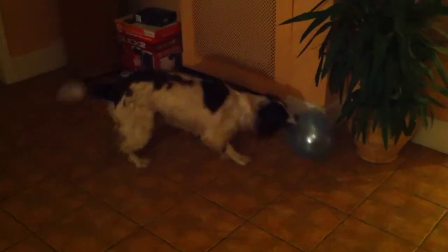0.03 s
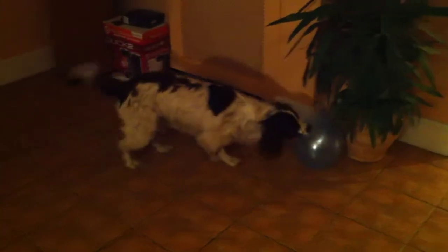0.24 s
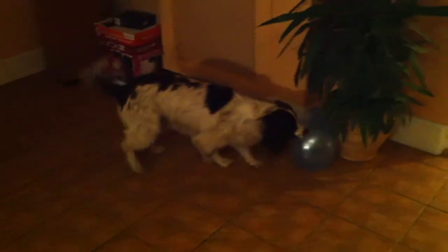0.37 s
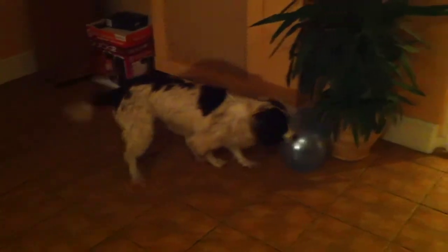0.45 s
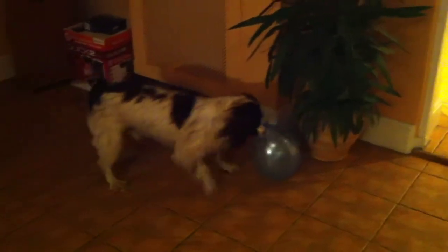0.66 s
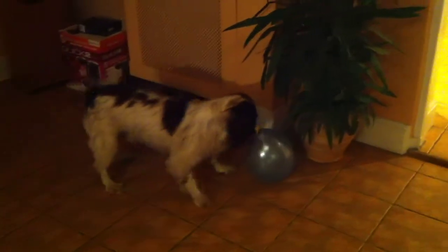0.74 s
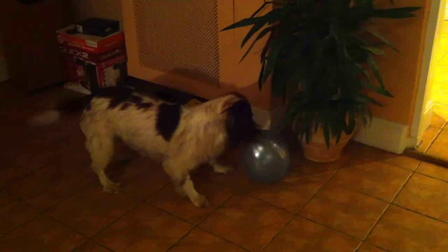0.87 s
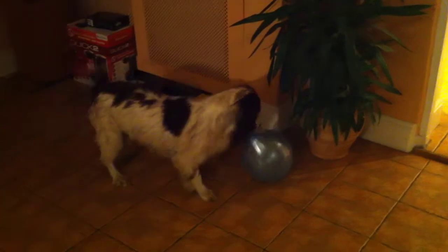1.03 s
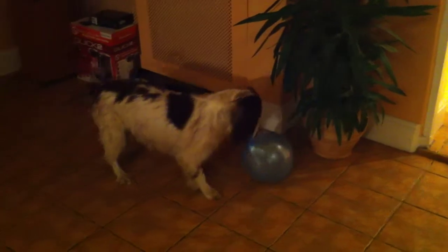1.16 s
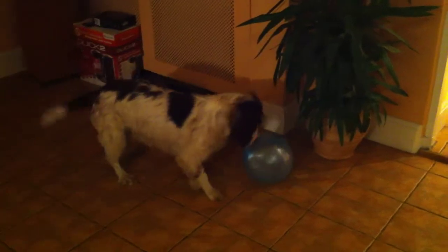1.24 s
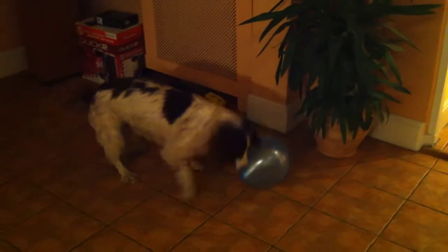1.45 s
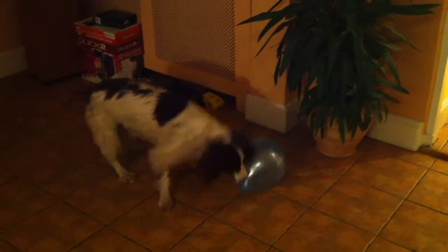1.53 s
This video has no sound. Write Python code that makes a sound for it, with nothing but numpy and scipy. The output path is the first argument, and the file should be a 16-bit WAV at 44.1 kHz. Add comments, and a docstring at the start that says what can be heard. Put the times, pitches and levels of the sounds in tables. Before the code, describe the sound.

A rubber balloon squeaks and bumps as a dog noses it across a tiled floor.

```python
"""A dog noses a balloon across the tiled floor of a hard, echoing room.
First a paw scuffs and the muzzle rubs the rubber, ringing the air inside, with a few soft bumps.
Almost at once the rubber sticks and slips in a shrill squeak, then in a lower, rasping one.
Paws go on scuffing the tiles under a tiny creak and fainter bumps.
A firmer bump comes near the end and rings in the room."""
import sys
import numpy as np
from scipy import signal
from scipy.fft import rfft, irfft, next_fast_len
from scipy.io import wavfile
from scipy.ndimage import map_coordinates

SR = 44100
rng = np.random.default_rng(int(sys.argv[2]) if len(sys.argv) > 2 else 0)


def unload_audio(sound):
    """Save the sound as a 16-bit wav file, at the path given as the first command line argument."""
    columns = np.transpose(np.atleast_2d(sound))
    # keep every value between -1 and 1, then stretch to whole-number steps
    steps = np.round(np.clip(columns, -1, 1) * 32767)
    wavfile.write(sys.argv[1], SR, steps.astype(np.int16))


N = 70560

# The dull colour of a soft scrape, paw or muzzle. Each row: frequency in Hz, level in dB.
SOFT_SCRAPE = [(40, -18.5), (90, -9), (140, -1.5), (280, -3), (480, 0), (750, 0.5), (1100, 2.5), (1550, -4),
               (2500, -8), (5000, -24), (16000, -34.5)]


def amp(db):
    return 10 ** (np.asarray(db) / 20)


def unit(x):
    return x / np.sqrt(np.mean(x ** 2) + 1e-20)


def along(points, hz):
    """Read a curve of (Hz, value) points on a log frequency axis."""
    freqs, values = np.transpose(points)
    return np.interp(np.log(hz + 1), np.log(freqs + 1), values)


def filtered(x, response):
    """Shape x with a gain that depends on frequency."""
    size = next_fast_len(N + 4096)
    return irfft(rfft(x, size) * response(np.fft.rfftfreq(size, 1 / SR)), size)[:N]


def coloured(x, spectrum):
    """EQ x with a curve of (Hz, dB) points and bring it to rms 1."""
    return unit(filtered(x, lambda hz: amp(along(spectrum, hz))))


def noise(spectrum):
    return coloured(rng.standard_normal(N), spectrum)


def wobble(rate):
    """A smooth random curve, rate knots a second."""
    return map_coordinates(rng.standard_normal(N // 8), [np.arange(N) * rate / SR], mode="wrap")


def stroke(start, length, attack_s=0.002, release_s=0.0066):
    """Fade in, hold, and fade out across the end of the stroke."""
    t = np.arange(N) / SR - start
    return np.clip(t / attack_s, 0, 1) * np.clip((length - t) / release_s + 0.5, 0, 1)


def room_tone():
    """A faint, steady bed of low noise."""
    # Each row: frequency in Hz, level in dB.
    bed_colour = [(25, -3), (60, 1), (130, 10.5), (300, 5.5), (1000, 0), (2000, -2.5), (5000, -8),
                  (10000, -11.5), (16000, -10.5)]
    return amp(-65.5) * noise(bed_colour)


def room(x, wet_db, build_s=0.0086):
    """Direct sound, a few slaps off the walls and a dense tail that lingers in the low mids."""
    # Each row: frequency in Hz, seconds to die away by 60 dB.
    decay_times = [(100, 0.2), (300, 0.99), (1100, 0.74), (2600, .68), (5000, 0.72), (9000, 0.57),
                   (15000, 0.49)]
    # Each row: echo delay in seconds, level in dB.
    wall_echoes = [(0.0121, -11), (0.028, -6), (0.07, -11.5)]
    hz, t, spectra = signal.stft(rng.standard_normal(SR), SR, nperseg=256)
    decay = amp(-60 * t / along(decay_times, hz)[:, None])
    build = 1 - np.exp(-t / build_s)
    tail = signal.istft(spectra * decay * build, SR, nperseg=256)[1]
    reverb = amp(-2) * tail / np.linalg.norm(tail)
    for delay, db in wall_echoes:
        reverb[round(delay * SR)] += amp(db)
    return amp(-3.5) * x + amp(wet_db) * signal.fftconvolve(x, reverb)[:N]


def paw_scuffs():
    """Each paw on the tiles gives a dull scrape of the pad and a hiss of claws and fur."""
    # Each row: start in seconds, length in seconds, pad level in dB, hiss level in dB.
    scuffs = [(-.03, 0.052, -53.5, -49.5), (0.623, .14, -56.5, -72), (0.802, 0.019, -51.5, -48.5),
              (0.829, 0.13, -55.5, -66.5), (1.197, 0.052, -62, -59.5), (1.256, 0.048, -63.5, -76),
              (1.40, 0.073, -61.5, -69.5), (1.481, 0.16, -73, -67), (1.545, 0.079, -63.5, -58)]
    # Claws and fur. Each row: frequency in Hz, level in dB.
    hiss_colour = [(300, -7), (1500, -8), (3000, -1.5), (5500, 2), (9000, -2), (16000, -4.5)]
    track = np.zeros(N)
    for start, length, pad_db, hiss_db in scuffs:
        pad = amp(pad_db) * noise(SOFT_SCRAPE)
        hiss = amp(hiss_db) * noise(hiss_colour)
        track += stroke(start, length) * (pad + hiss)
    return track


def cavity(hz):
    """The hollow resonance of the air inside the balloon."""
    # Each row: centre in Hz, width in Hz, level in dB.
    air_modes = [(209.7, 33, -1), (390, 190, -7), (560, 137, 0.5), (1240, 132, -1), (2084, 360, 0),
                 (3246, 350, -0.5)]
    return sum((-1) ** k * amp(db) * 1j * hz * width / (centre ** 2 - hz ** 2 + 1j * hz * width)
               for k, (centre, width, db) in enumerate(air_modes))


def balloon_bumps(attack_s=0.0014, decay_s=0.014, corner_hz=300):
    """A short push rings the balloon; a soft one reaches only its low modes."""
    # Each row: start in seconds, level in dB, dulling above the corner in dB per octave.
    pushes = [(.1, -44, 9.5), (0.226, -45, -8), (.298, -38, 11), (0.822, -52, -0.5), (1.228, -63.5, 5),
              (1.434, -64, 3), (1.561, -41.5, 3.5)]
    track = np.zeros(N)
    for start, db, dull_db in pushes:
        t = np.maximum(np.arange(N) / SR - start, 0)
        push = rng.standard_normal(N)
        ring = filtered(push, lambda hz: cavity(hz) * amp(-dull_db * np.log2(1 + hz / corner_hz)))
        envelope = np.exp(-t / decay_s) * (1 - np.exp(-t / attack_s))
        track += amp(db) * unit(ring) * envelope
    return track


def muzzle_rubs(grain_db=1, grains_per_s=600):
    """The muzzle catches and lets go on the skin: grainy friction that also rings the air inside."""
    # Each row: start in seconds, length in seconds, level in dB, boom over the friction in dB.
    slides = [(-.03, 0.054, -49.5, 24), (0.053, 0.058, -46.5, -4), (0.085, 0.13, -46.5, -5),
              (0.22, 0.036, -34, -22.5), (0.297, 0.035, -35, -15.5), (0.408, 0.059, -38, -12.5)]
    # Each row: frequency in Hz, level in dB.
    friction_colour = [(60, -35), (200, -0.5), (500, -8), (900, -6.5), (1200, 4.5), (1450, -1.5), (2000, 4),
                       (3200, 1.5), (4500, -1.5), (8000, -7.5), (13000, -11), (16000, -21)]
    track = np.zeros(N)
    for start, length, db, boom_db in slides:
        friction = unit(noise(friction_colour) * amp(grain_db * wobble(grains_per_s)))
        boom = amp(boom_db) * unit(filtered(noise(SOFT_SCRAPE), cavity))
        track += amp(db) * unit(friction + boom) * stroke(start, length)
    return track


def squeak(start, length, first_hz, last_hz, db, rough, slope_db, jitter=0.08, jitters_per_s=700):
    """Rubber sticks and slips at an unsteady pitch, with a puff of rasp at every slip."""
    # How the skin radiates the tone. Each row: frequency in Hz, level in dB.
    skin_colour = [(500, -25), (1100, -5), (2600, -2.5), (4000, -0.5), (5300, -2), (8000, -3),
                   (11000, -2.5), (16000, -10.5)]
    # The noise of slipping. Each row: frequency in Hz, level in dB.
    rasp_colour = [(80, -36), (250, -18.5), (800, -22), (1300, -6.5), (2400, 2.5), (3500, -5.5), (6000, -8),
                   (11000, -21), (16000, -55.5)]
    glide = np.interp(np.arange(N) / SR, [start, start + length], [first_hz, last_hz])
    pitch = glide * (1 + jitter * rough * wobble(jitters_per_s))
    phase = 2 * np.pi * np.cumsum(pitch) / SR
    harmonics = [k for k in range(1, 13) if k * max(first_hz, last_hz) < 16950]
    slipping = sum(amp(slope_db * np.log2(k)) * np.sin(k * phase) for k in harmonics)
    tone = coloured(slipping, skin_colour)
    puffs = rng.standard_normal(N) * (1 + np.cos(phase))
    rasp = rough * amp(2) * coloured(puffs, rasp_colour)
    return amp(db) * stroke(start, length, release_s=0.013) * (tone + rasp)


def scene():
    """Squeaks, rubs, bumps and paw scuffs, each with its own amount of echo, over the faint bed."""
    # Short chirps that join into squeaks. Each row: start and length in seconds, first and last pitch
    # in Hz, level in dB, roughness from 0 to 1, overtone slope in dB per octave, reverb send in dB.
    chirps = [(0.174, 0.011, 3447, 2940, -40, 1, -32, -3.5),
              (0.19, 0.018, 2500, 2580, -32, .55, -15.5, -2.5),
              (0.202, .032, 2080, 1766, -31, .9, -13.5, -0.5),
              (0.214, .014, 2600, 2624, -21.5, 0.16, -7.5, -4.5),
              (0.232, 0.021, 2600, 2689, -15.5, .16, -11.5, -0.5),
              (0.409, 0.028, 2620, 2830, -39, .4, -17.5, -0.5),
              (0.415, 0.0296, 1088, 1183, -30.5, .45, -5.5, -4.5),
              (0.693, 0.0593, 887, 829, -57, 0.4, -15, -5.5)]
    squeaks = sum(room(squeak(*chirp), wet_db) for *chirp, wet_db in chirps)
    rubs = room(muzzle_rubs(), wet_db=0.5)
    bumps = room(balloon_bumps(), wet_db=1.5)
    paws = room(paw_scuffs(), wet_db=0)
    return (room_tone() + paws + bumps + rubs + squeaks)[None]


def record(dry, low_cut_hz=138, top_hz=15950):
    """Thin the bass and cut off the very top."""
    return filtered(dry[0], lambda hz: (hz < top_hz) * hz ** 2 / np.hypot(hz ** 2, low_cut_hz ** 2))[None]


dry = scene()
out = record(dry)
unload_audio(out)
```